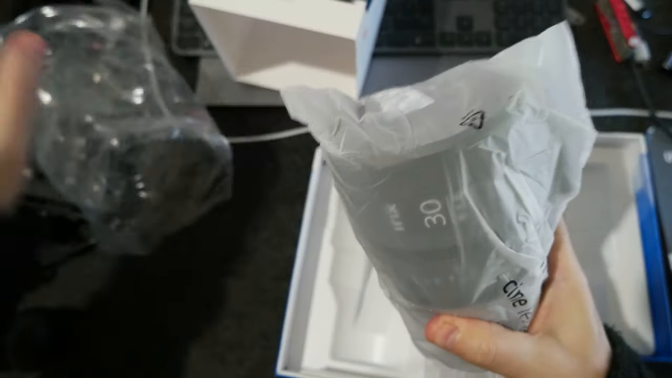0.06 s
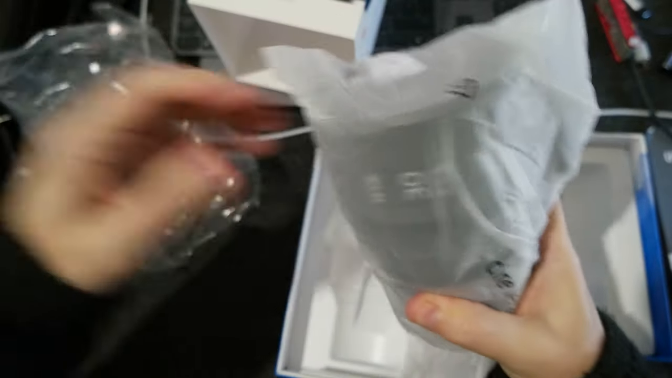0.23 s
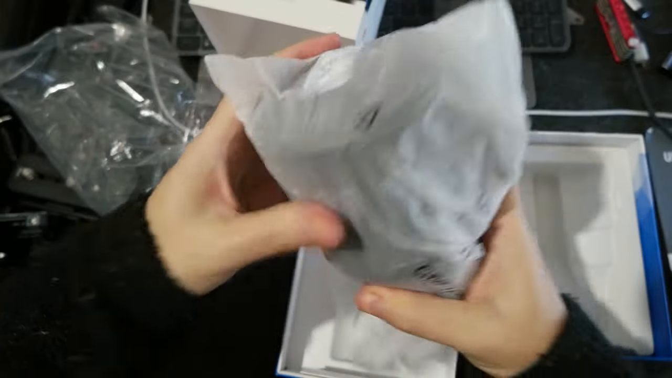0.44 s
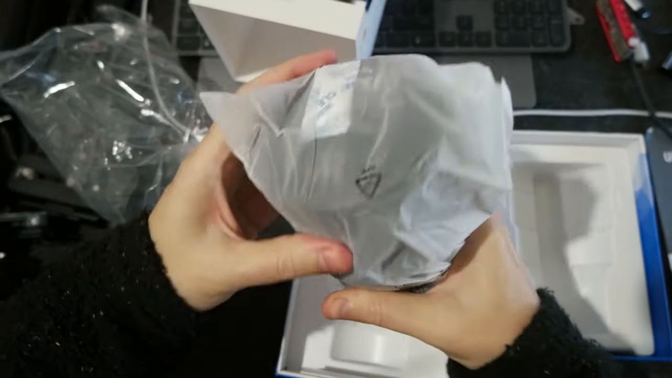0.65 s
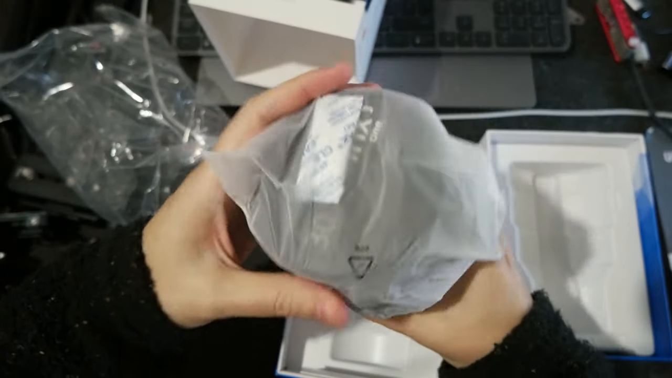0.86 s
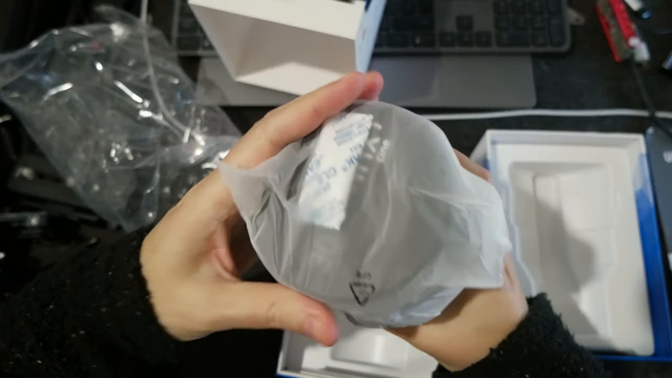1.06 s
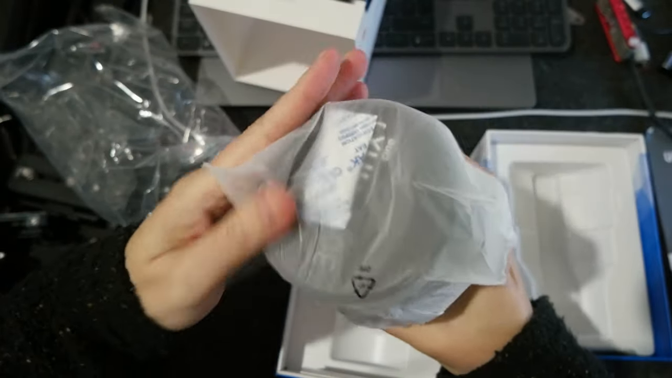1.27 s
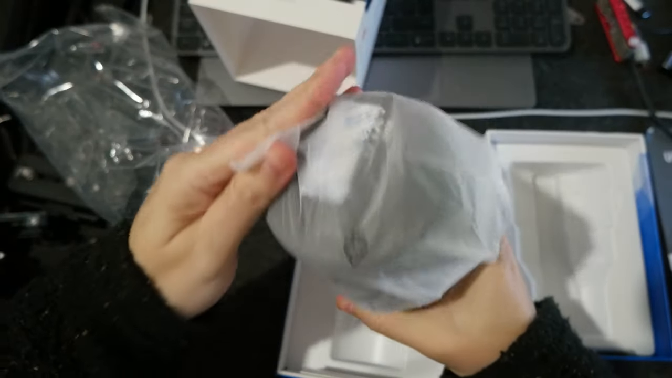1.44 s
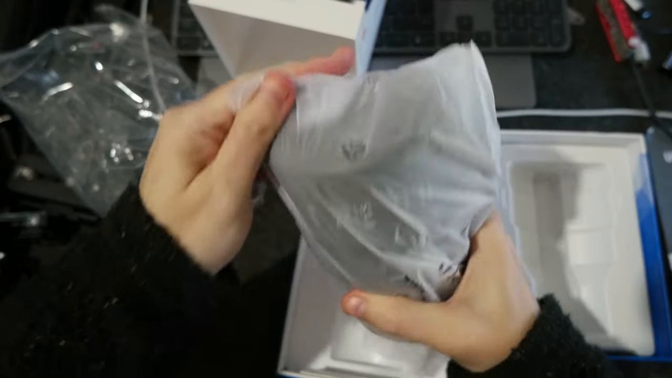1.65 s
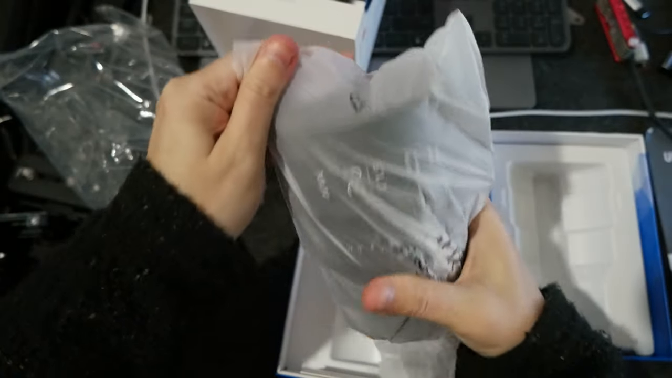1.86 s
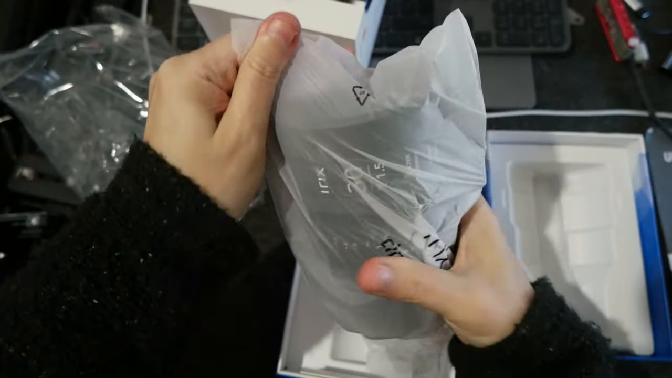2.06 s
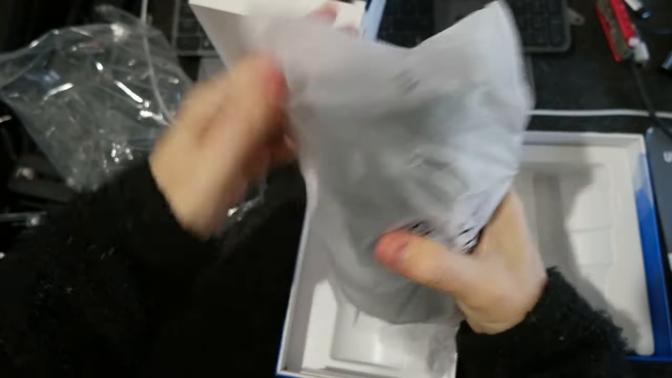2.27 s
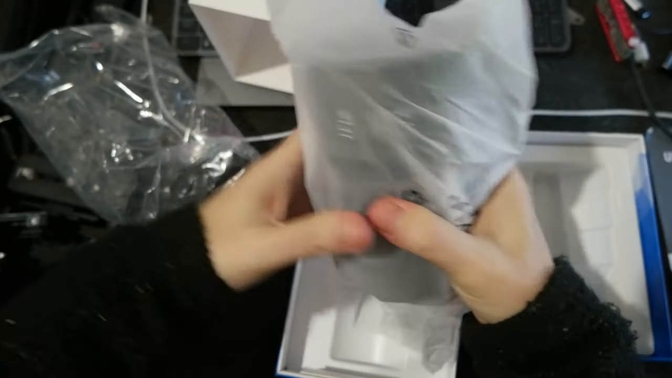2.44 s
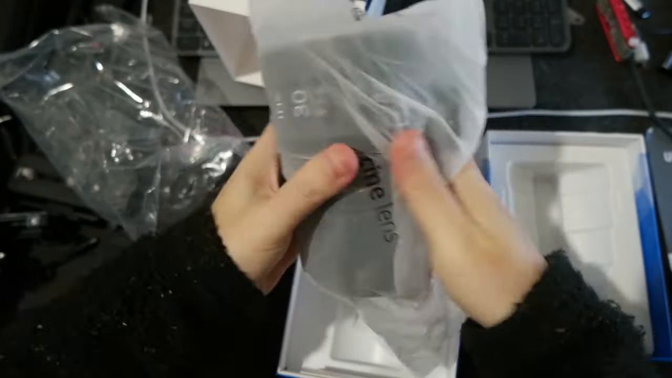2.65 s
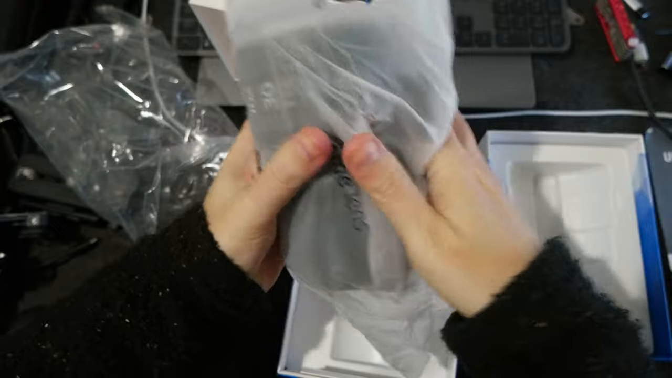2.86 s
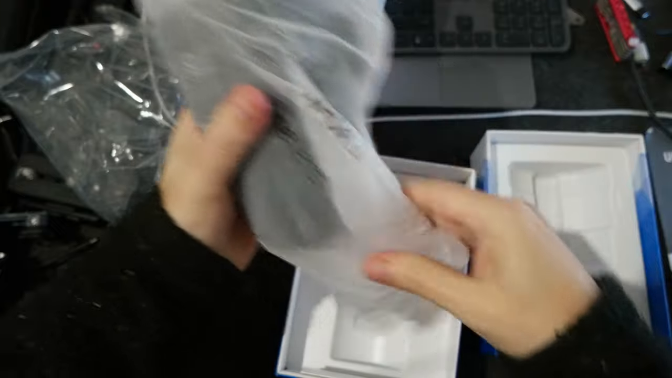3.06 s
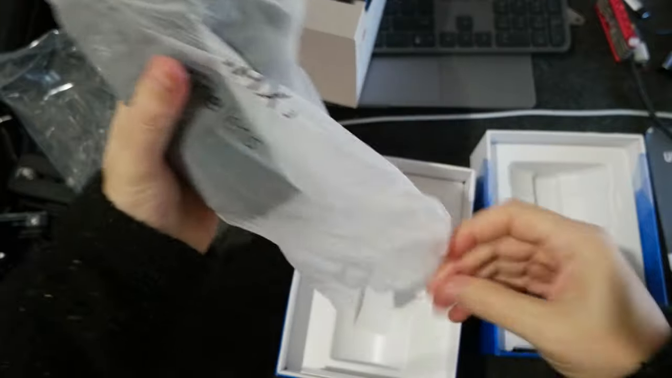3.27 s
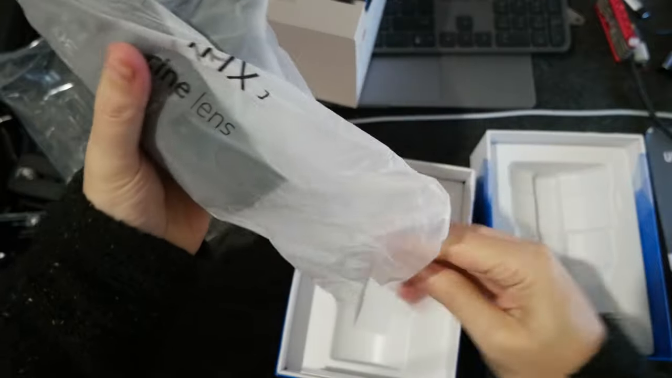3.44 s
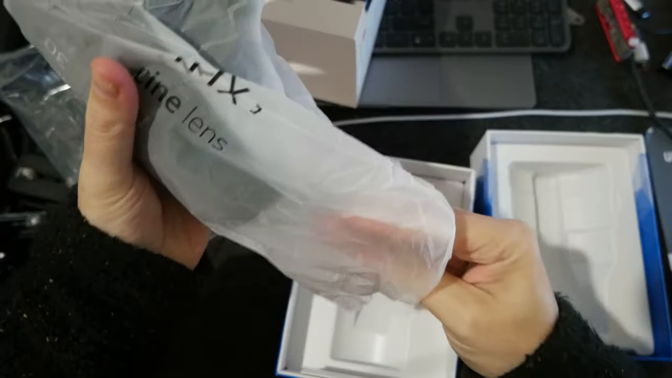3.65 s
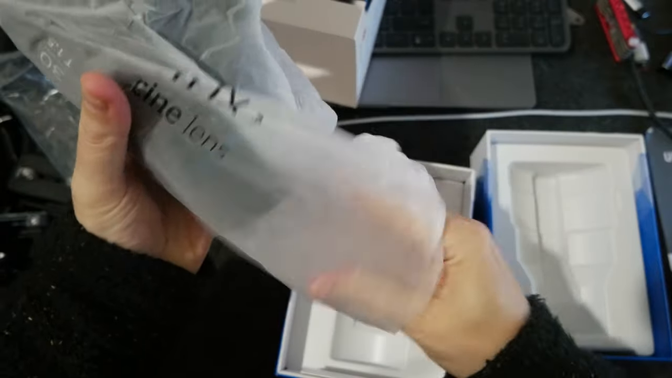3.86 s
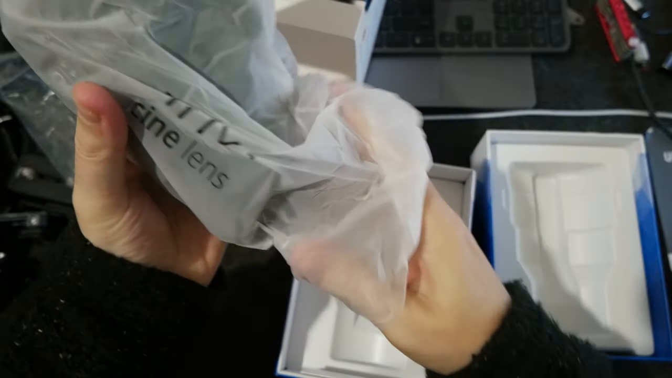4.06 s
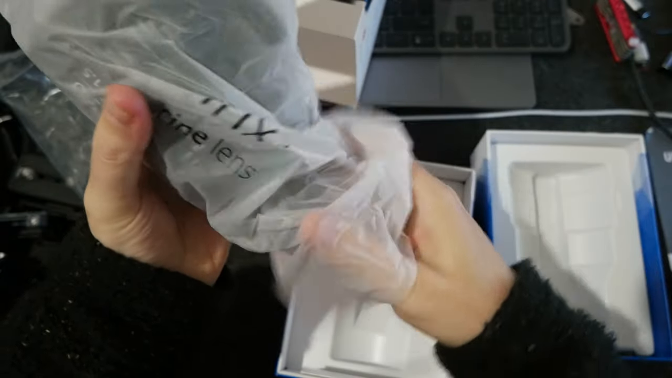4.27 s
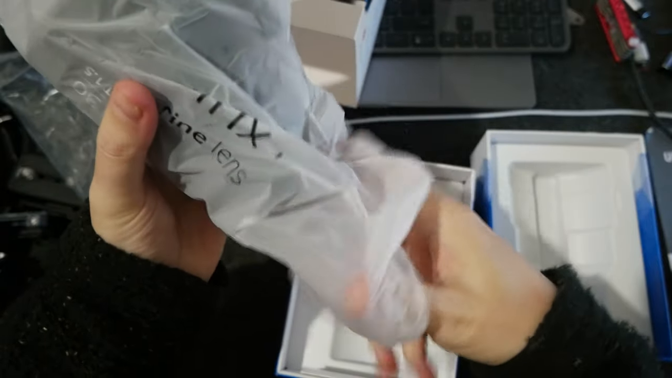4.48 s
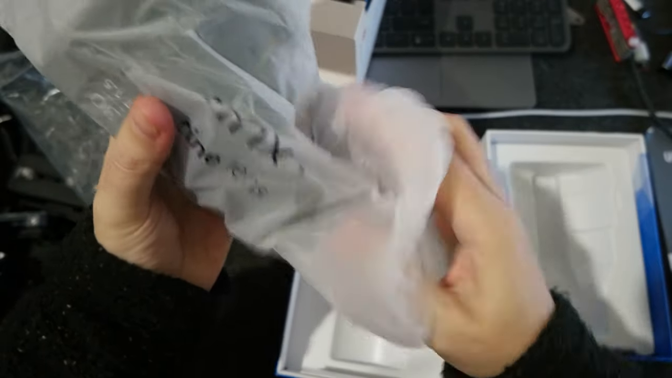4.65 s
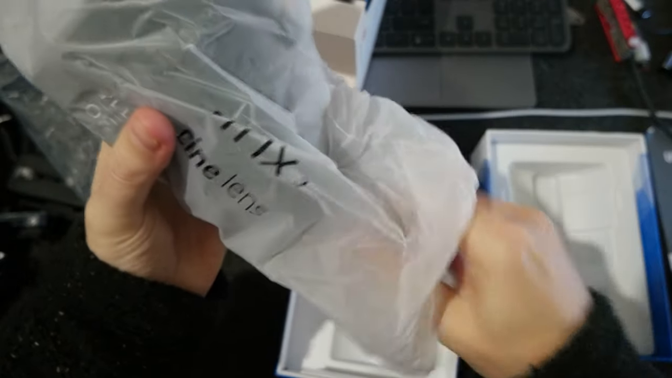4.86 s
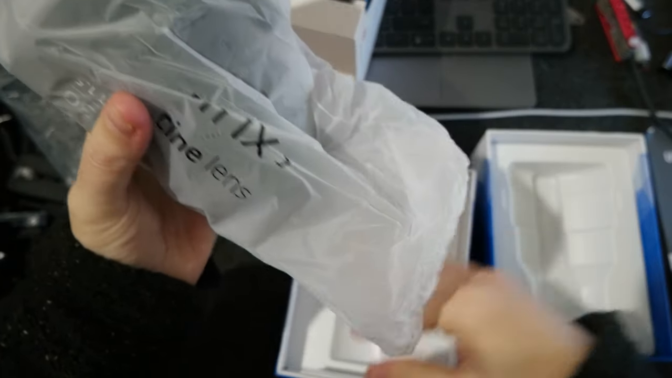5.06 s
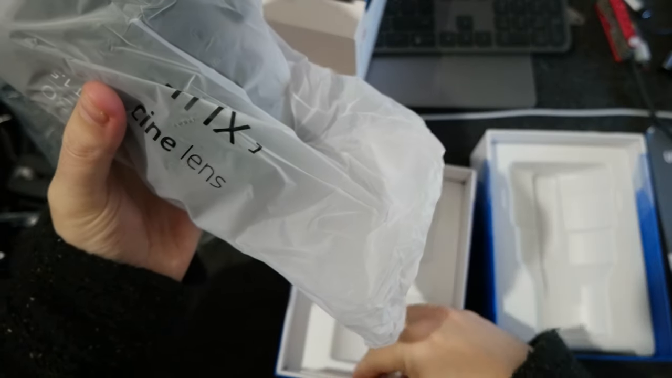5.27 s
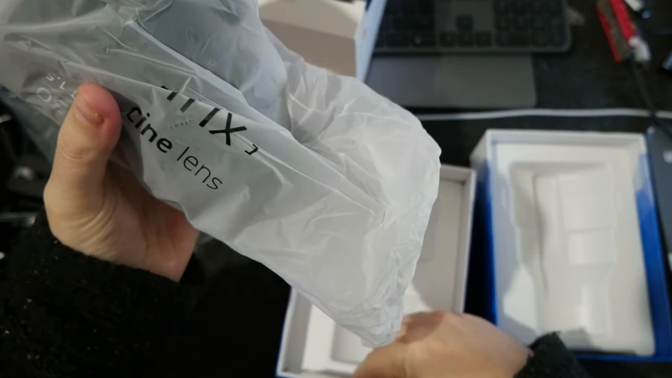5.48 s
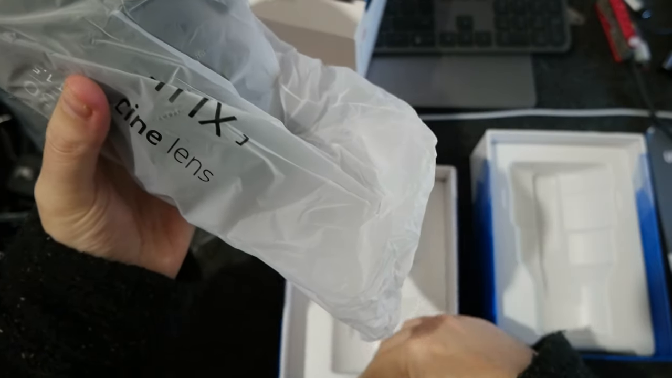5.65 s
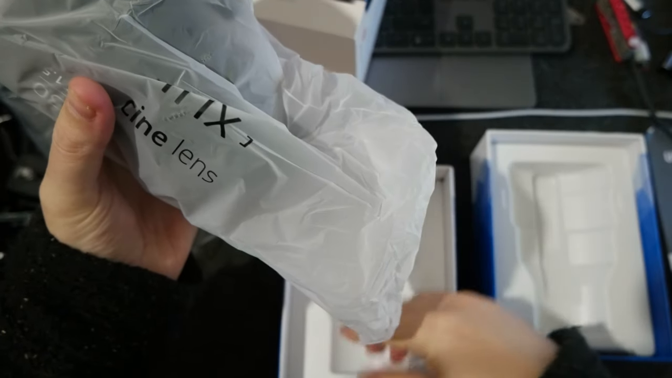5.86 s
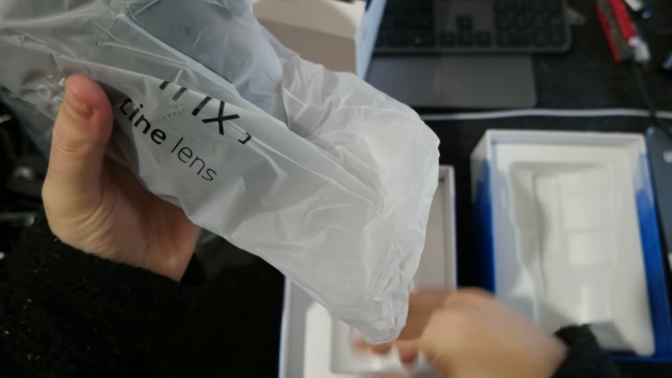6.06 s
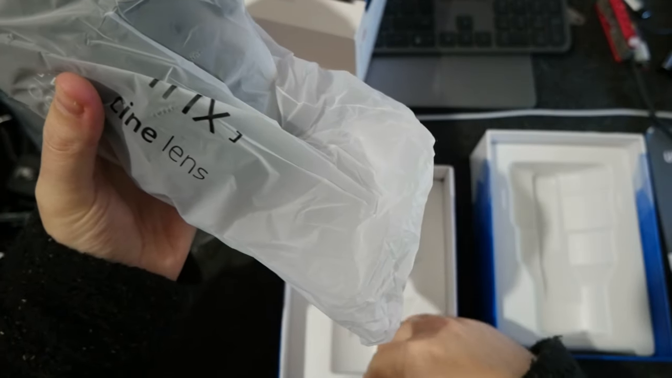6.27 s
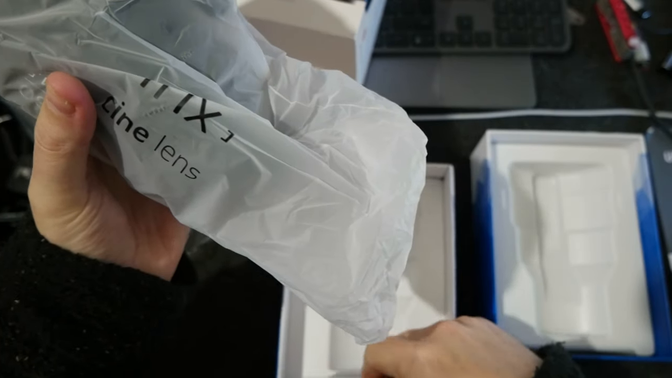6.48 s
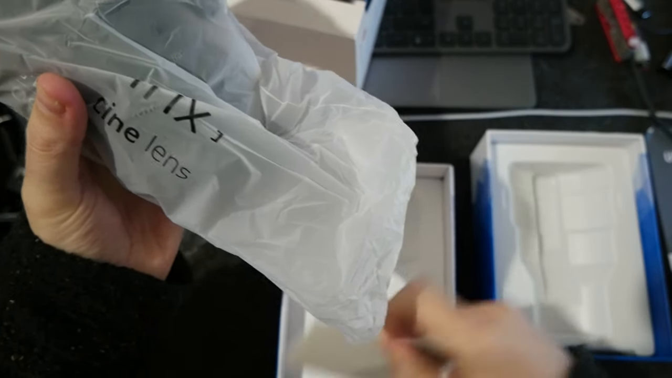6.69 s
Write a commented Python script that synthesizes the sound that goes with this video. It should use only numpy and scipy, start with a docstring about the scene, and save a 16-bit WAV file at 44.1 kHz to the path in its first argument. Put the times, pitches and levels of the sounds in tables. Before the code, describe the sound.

Close stereo pickup in a small indoor room: hands handle a thin plastic bag over a desk. Crisp, dense crackles come in quick irregular squeezes, with sharp bright snaps and soft low pops from air pockets. After nearly five seconds it drops to faint scattered ticks over a very low airy hush, then a hand slides briefly through a carton with a dull hollow rub.

```python
"""Thin plastic film crackles at once and close by: hands turn, squeeze and stretch a bag over a desk.
The film buckles in thousands of tiny creases, each a damped resonance struck by one impulse; larger folds
snap with a bright and a dull click, air pockets pop with low rings, and at the end a hand slides through
a carton, friction noise ringing its wall and hollow. Sparse decaying echoes return it all from the room
over a faint fan-like hush of shaped noise."""
import sys
import numpy as np
from scipy import signal
from scipy.fft import rfft, irfft, next_fast_len
from scipy.io import wavfile
from scipy.ndimage import uniform_filter1d

SR = 44100
rng = np.random.default_rng(int(sys.argv[2]) if len(sys.argv) > 2 else 0)


def generate_wav(signal):
    """Clip the signal to [-1, 1] and save it as 16-bit WAV at the path in sys.argv[1]."""
    frames = np.transpose(np.atleast_2d(signal))
    scaled = np.clip(frames, -1, 1) * 32767
    pcm = np.round(scaled).astype(np.int16)
    wavfile.write(sys.argv[1], SR, pcm)


N = 296337  # samples

# Colour of the film's clicks as the microphones receive them.
# Each row: frequency in Hz, relative level in dB per Hz.
FILM_COLOUR = [(24, -77), (40, -52), (231, -13.5), (345, -9.5), (382, -10), (697, -7), (751, -8.5),
               (831, -7.5), (1760, -4), (2000, -2.5), (7360, 0), (12800, 7), (16000, -1)]

EDGE_HZ = 15850  # upper band limit
GLIDE_S = 6.3  # from here the film glides instead of crumpling


def gain_of(db):
    """Logarithmic level: 20 dB is a factor of ten in amplitude."""
    return 10 ** (np.asarray(db) / 20)


def evened(x):
    """Normalisation by mean power: scales to rms 1."""
    return x / np.sqrt(np.mean(x ** 2) + 1e-20)


def read(points, hz):
    """Linear interpolation of a table along log frequency."""
    f, value = np.transpose(points)
    return np.interp(np.log(hz + 1), np.log(f + 1), value)


def crease(hz, centre_hz, sharp):
    """Damped resonance applied twice, with top gain 1: the response of one buckling patch."""
    detuning = hz / centre_hz - centre_hz / (hz + 1)
    return 1 / (1 + 1j * sharp * detuning) ** 2


def sides(pan_db):
    """Level difference between the channels: left over right in dB, split evenly into two gains."""
    return gain_of(np.array([pan_db, -pan_db]) / 2)


def stereo_width(hz, place, lean=0.071):
    """Stereo width: opposite phase shifts between left and right, growing with frequency, spread the crackle."""
    # Left-right phase at place + lean = 1. Each row: frequency in Hz, phase in radians.
    side_phase = [(300, 0.041), (2000, 0.033), (4000, 0.9), (8000, 1.23), (15000, 1.7)]
    shift = np.exp(.5j * (place + lean) * read(side_phase, hz))
    return np.array([shift, 1 / shift])


def hush(level_db=-55, patchy_db=.5):
    """Stationary noise with partial coherence: a hump in the low middle, in drifting patches."""
    # Spectrum of the room noise. Each row: frequency in Hz, relative level in dB per Hz.
    hush_colour = [(24, -69), (40, -29.5), (329, -14), (354, -5), (392, -17), (663, -5), (810, -12),
                   (1300, -16), (1410, -17), (1810, -12), (2320, -16), (12800, -28), (16000, -32.5)]
    # Left-right likeness of the noise. Each row: frequency in Hz, coherence from 0 to 1.
    likeness = [(60, 0.93), (180, 0.23), (550, 0.71), (1650, 0.73), (4970, 0.14), (15000, 0.16)]
    frames, hz = N // 256 + 5, np.fft.rfftfreq(1024, 1 / SR)
    a, b, c, d, patches = rng.standard_normal((frames, 513, 5)).T
    patches = uniform_filter1d(patches, size=20, axis=0)  # across frequency
    patches = evened(uniform_filter1d(patches, size=14, axis=1))  # across time
    same = np.clip(read(likeness, hz), -1, 1)[:, None]
    left, other = a + 1j * b, c + 1j * d
    z = np.array([left, same * left + np.sqrt(1 - same ** 2) * other])
    z *= gain_of(read(hush_colour, hz)[:, None] + patchy_db * patches)
    noise = signal.istft(z, nperseg=1024, noverlap=768)[1][:, :N]
    return gain_of(level_db) * evened(noise)


def effort():
    """Power addition of incoherent sources: squeezes sum to levels of panels, folds and creases each ms."""
    # Squeezes, pulls and turns of the hands. Each row: time of the peak in seconds, level of the small
    # creases in dB, rise and fall in seconds (over 20 dB for folds and creases), middle folds in dB over
    # the small creases, wide panels in dB over the small creases.
    squeezes = [(0.029, -37.5, 0.27, 0.074, 2, 3), (.16, -59.5, 0.19, 0.19, 15.5, 15.5),
                (.333, -35, .004, 0.095, -15, -9.5), (0.368, -28, 0.033, 0.063, -11.5, -30),
                (.457, -32, 0.029, 0.12, -9, -20), (.541, -29.5, 0.16, 0.15, -10, -15.5),
                (.662, -43.5, 0.14, 0.16, -1, -10.5), (.762, -35, .05, 0.16, -11, -11.5),
                (.86, -35, 0.16, 0.12, -5, -14), (1.0, -32, 0.071, 0.056, -6.5, -21),
                (1.07, -41.5, 0.086, .15, -12, -10.5), (1.15, -39, 0.12, 0.17, -11, -16.5),
                (1.225, -34, 0.038, 0.088, -5, -24), (1.303, -28.5, .12, .16, -4.5, -17.5),
                (1.443, -29.5, 0.052, 0.13, -10, -16), (1.556, -24, 0.094, 0.093, -5, -16.5),
                (1.64, -29, 0.058, 0.09, -6.5, -18.5), (1.732, -28, 0.059, 0.13, -4, -15.5),
                (1.82, -32, 0.067, 0.17, -4, -15), (1.9, -36, 0.075, .15, -6.5, -12),
                (2.03, -30, .13, 0.12, -10, -16), (2.15, -43, .015, 0.11, -18, -3),
                (2.221, -26.5, 0.077, .1, -7, -16), (2.41, -51, 0.21, 0.22, -2, -4),
                (2.487, -21, 0.031, 0.19, -10.5, -18.5), (2.696, -32.5, 0.12, 0.12, -5, -17),
                (2.86, -37, 0.19, 0.25, -15, -12), (2.941, -31, 0.18, 0.064, -7, -23),
                (3.083, -20, 0.066, 0.16, -8.5, -14.5), (3.18, -31, 0.15, 0.032, -6, -12),
                (3.305, -46, 0.016, 0.084, -2, -7), (3.461, -38, 0.011, 0.27, -7, -9),
                (3.546, -31.5, 0.044, .13, -8, -13.5), (3.62, -46, 0.093, 0.11, 1, -19),
                (3.71, -36, .007, 0.22, -8, -24), (3.77, -32.5, 0.05, 0.08, -4, -9.5),
                (3.893, -25.5, 0.17, 0.2, -3.5, -14.5), (4.0, -26.5, 0.22, 0.4, -5, -14.5),
                (4.109, -48, .3, 0.12, -24, -15), (4.235, -29, 0.026, 0.067, -6, -20),
                (4.285, -20, 0.077, .11, -6, -15), (4.41, -21.5, 0.036, 0.12, -5, -16.5),
                (4.54, -24.5, 0.08, 0.16, -4, -12.5), (4.63, -24, 0.13, 0.15, -7.5, -14.5),
                (4.73, -30.5, 0.042, 0.071, -8, -15), (4.825, -43.5, 0.068, 0.11, 3.5, -3.5),
                (4.99, -44.5, 0.013, 0.15, 1, -2.5), (5.044, -44.5, 0.11, 0.034, -2, -22),
                (5.34, -59.5, 0.016, 0.14, -7, 6), (5.448, -59, .1, 0.032, -13, -7),
                (5.625, -42.5, 0.0091, 0.095, -1.5, -12), (5.715, -46, .06, 0.067, 1, -5),
                (6.191, -48.5, .02, 0.058, -11, -5), (6.28, -62, 0.15, 0.42, -5, -8),
                (6.37, -51.5, 0.042, .2, 2.5, 1.5), (6.46, -37.5, 0.079, 0.24, 2.5, -15.5),
                (6.565, -26.5, 0.078, 0.11, -8.5, -18.5)]
    # Share of the swell in dB that each size follows, in the order panels, folds, creases [no unit].
    follow = [0.75, 1, 1]
    # Level of a bag that is only held, in the order panels, folds, creases [dB].
    held_db = [-69.5, -69.5, -70]
    rise_shape, fall_shape = 1.8, 1.5  # 1 = pointed swell in dB, 2 = round
    s = np.arange(0, N / SR + .001, .001)
    top_s, small_db, rise, fall, middle_db, wide_db = np.transpose(squeezes)[:, :, None]
    rising = abs((top_s - s) / rise) ** rise_shape
    falling = abs((s - top_s) / fall) ** fall_shape
    drop_db = -20 * np.where(s < top_s, rising, falling)
    tops_db = [small_db + wide_db, small_db + middle_db, small_db]
    power = [np.sum(gain_of(top + share * drop_db) ** 2, axis=0) + gain_of(rest) ** 2
             for top, share, rest in zip(tops_db, follow, held_db)]
    return s, 10 * np.log10(power)


def crackle(per_s=14000, spread_db=3.0, clump_db=1.0, patch_db=4.0, clump_s=0.0086, kicks_per_s=120,
            pan_db=-0.8, sharp=0.89):
    """Shot noise through resonances: random creases of many sizes and places clump under the fingers.

    The three spreads, spread_db, clump_db and patch_db, are for an unevenness of 1.
    """
    # Bands where panels, folds and creases sound. Each row: low edge in Hz, high edge in Hz.
    size_bands = [(200, 1200), (1500, 5000), (6000, 16000)]
    size = next_fast_len(N + 4096)
    hz, t = np.fft.rfftfreq(size, 1 / SR), np.arange(N) / SR
    s, levels_db = effort()
    # 0.69 where small creases reach -31.5 dB; louder squeezes crackle more evenly
    uneven = np.where(s < GLIDE_S, 0.69 - 0.05 * (levels_db[2] + 31.5), .15)
    uneven = np.clip(uneven, 0, .7)
    when, kind, strength, chance = rng.random((200000, 4)).T
    at = (when * N).astype(int)

    # a slip starts at once and dies away
    kicks = rng.exponential(1, (7, N)) ** 2 * (rng.random((7, N)) < kicks_per_s / SR)
    slips = signal.lfilter([1], [1, -np.exp(-1 / (clump_s * SR))], kicks)
    drift = np.log(slips + 0.36)
    # one pace for the whole bag, one for each range of crease size
    clumps, *patches = evened(drift - drift.mean())
    patch = np.array(patches)[(kind * len(patches)).astype(int), at]

    blow_db = np.minimum(-spread_db * np.log(1 - strength), 4 * spread_db)
    blow_db = blow_db + clump_db * clumps[at] + patch_db * patch
    struck = chance < per_s * N / SR / len(at)
    blow = gain_of(blow_db * np.interp(t[at], s, uneven)) * struck
    # even out the local power, so that the hands set the effort
    power = uniform_filter1d(np.bincount(at, blow ** 2, N), size=4000)
    blow = blow / np.sqrt(power[at] + 1e-9)

    pitches = np.geomspace(120, 15500, 16)  # Hz
    places = np.linspace(-1, 1, 3)
    kind = (kind * len(pitches) * len(places)).astype(int)
    # the summed power of all resonances is divided out below
    cover = np.sqrt(sum(abs(crease(hz, f, sharp)) ** 2 for f in pitches) / len(pitches))
    colour = gain_of(read(FILM_COLOUR, hz))
    share_db = [10 * np.log10(np.sum(colour[(hz > lo) & (hz < hi)] ** 2) / len(hz))
                for lo, hi in size_bands]
    drive_db = levels_db - np.array(share_db)[:, None]
    centres = np.log(np.sqrt(np.prod(size_bands, axis=1)))

    out = np.zeros((2, len(hz)), complex)
    for k, centre_hz in enumerate(pitches):
        # blend the levels of the nearest sizes
        weights = [np.interp(np.log(centre_hz), centres, one) for one in np.eye(len(size_bands))]
        gain = gain_of(np.interp(t, s, weights @ drive_db)) * sides(pan_db)[:, None]
        for p, place in enumerate(places):
            mine = kind == k * len(places) + p
            pair = rfft(np.bincount(at[mine], blow[mine], N) * gain, size)
            out += pair * crease(hz, centre_hz, sharp) * stereo_width(hz, place)
    return irfft(out / cover * colour, size)[:, :N]


def pops():
    """Impulse response of a low resonance: air pockets and wide panels pop with a soft ring."""
    # Each row: start in seconds, peak level in dB, pitch in Hz, sharpness of the resonance (no unit).
    pop_rows = [(.029, -30.5, 1620, 38), (.031, -23, 960, 3.6), (.761, -37, 750, 2.5),
                (.871, -37, 656, 5.5), (1.05, -38, 670, 2.7), (1.552, -28, 1070, 3.7),
                (1.729, -33, 840, 3.3), (1.841, -26.5, 2150, 8.1), (2.19, -41, 550, 1.6),
                (2.214, -40, 534, 3.6), (2.507, -30.5, 840, 1.9), (4.107, -26, 880, 4.4),
                (4.292, -23, 680, 1.7), (4.508, -28, 840, 5.3), (4.612, -31, 610, 2.2),
                (4.734, -39, 830, 3.8), (5.013, -35, 855, 1.4), (5.349, -47, 663, 9.8),
                (6.192, -49, 560, 3)]
    size = 4096
    out = np.zeros(N + size)
    hz = np.fft.rfftfreq(size, 1 / SR)
    for s, peak_db, centre_hz, sharp in pop_rows:
        ring = irfft(crease(hz, centre_hz, sharp), size)
        out[round(s * SR):][:size] += gain_of(peak_db) * ring / abs(ring).max()
    return out[:N]


def lesser_snaps(count=220, dull_hz=(2400, 5940)):
    """Uniform random timing: chance snaps whose strength follows the level of the small creases."""
    s, levels_db = effort()
    when, strength, dullness, pitch = rng.random((count, 4)).T
    when = .01 + when * (GLIDE_S - .01)
    bright_db = np.interp(when, s, levels_db[2]) + 11 + 6 * strength  # 11 to 17 dB over the creases
    dull_db = bright_db + np.interp(dullness, [0, 1], (-6, -20))  # 6 to 20 dB under the bright click
    return np.transpose([when, bright_db, dull_db, dull_hz[0] + pitch * (dull_hz[1] - dull_hz[0])])


def snaps(sharp=1.8, rattle_sharp=0.62, shared_part=0.96, grit_db=7.5, t60=0.036):
    """Snap-through buckling: a fold flips with a bright and a dull click, and the film around it rattles."""
    # The clearest folds that snap alone. Each row: time in seconds, level of the bright click in dB,
    # level of the dull click in dB, pitch of the dull click in Hz.
    clear_snaps = [(0.032, -19, -13, 1700), (0.1082, -45, -29, 2100), (0.123, -35, -19, 2400),
                   (0.1495, -38, -19, 2800), (0.2522, -47, -25, 2700), (0.3426, -9, -16, 5600),
                   (0.369, -12, -18, 5100), (0.3794, -3, -22, 3600), (0.4492, -14, -33, 3000),
                   (0.5023, -13, -25, 3900), (0.5951, -13, -28, 4100), (0.6065, -11, -27, 4800),
                   (0.6338, -17, -35, 3500), (0.6622, -20, -32, 4600), (0.703, -24, -40, 2600),
                   (0.7546, -13, -26, 4500), (0.8676, -13, -19, 5600), (0.8761, -14, -24, 4900),
                   (0.897, -19, -22, 3400), (0.9248, -20, -26, 4100), (0.938, -22, -31, 3500),
                   (0.9655, -13, -29, 3300), (0.9837, -11, -25, 3900), (0.9945, -14, -17, 4300),
                   (1.005, -13, -30, 4500), (1.1253, -30, -29, 3300), (1.1327, -20, -37, 5100),
                   (1.1411, -14, -32, 3700), (1.1552, -15, -31, 3700), (1.2185, -20, -14, 3300),
                   (1.2291, -9, -19, 5100), (1.2877, -9, -19, 3200), (1.2956, -13, -14, 3800),
                   (1.3517, -12, -22, 2700), (1.3728, -7, -29, 4400), (1.4079, -9, -21, 2600),
                   (1.4396, -10, -28, 3600), (1.4744, -7, -29, 5200), (1.4936, -12, -27, 4100),
                   (1.5235, -17, -16, 2800), (1.5377, -6, -20, 3400), (1.555, -5, -20, 2500),
                   (1.6208, -10, -21, 2400), (1.6322, -11, -15, 3300), (1.6971, -14, -19, 3100),
                   (1.7169, -11, -20, 3900), (1.7265, -7, -24, 4500), (1.7359, -6, -22, 4300),
                   (1.7551, -11, -22, 3100), (1.7863, -2, -24, 3500), (1.841, -13, -18, 3100),
                   (1.8631, -8, -28, 4300), (1.8834, -8, -23, 3500), (1.9115, -11, -30, 6100),
                   (1.9233, -2, -28, 4500), (1.9703, -10, -24, 4800), (1.9965, -14, -29, 3600),
                   (2.0366, -13, -28, 3500), (2.0766, -15, -35, 3200), (2.1402, -12, -37, 3700),
                   (2.1816, -13, -26, 2000), (2.2171, -5, -22, 4300), (2.2341, -2, -21, 5200),
                   (2.3417, -20, -31, 5600), (2.3558, -29, -36, 3700), (2.379, -31, -31, 4500),
                   (2.4163, -26, -31, 3700), (2.4321, -25, -41, 3000), (2.4417, -20, -31, 4100),
                   (2.4768, -10, -20, 2700), (2.5227, -5, -16, 3600), (2.5964, -9, -17, 5400),
                   (2.6569, -13, -26, 4600), (2.6892, -11, -21, 4200), (2.6981, -24, -20, 3800),
                   (2.7372, -24, -23, 5700), (2.8543, -19, -23, 4800), (2.8717, -23, -20, 4800),
                   (2.9052, -19, -18, 3300), (2.9372, -17, -19, 3900), (2.9565, -14, -23, 3100),
                   (2.976, -15, -27, 4300), (3.0139, -8, -24, 5200), (3.0818, -6, -22, 3700),
                   (3.1175, -5, -17, 3400), (3.2353, -20, -30, 3600), (3.2992, -27, -34, 3500),
                   (3.308, -29, -27, 3000), (3.4186, -44, -38, 2900), (3.461, -16, -32, 3300),
                   (3.6092, -29, -23, 2800), (3.7075, -22, -30, 5000), (4.0217, -3, -20, 3300),
                   (4.0437, -2, -17, 3300), (4.1235, -11, -25, 3800), (4.1591, -14, -24, 1800),
                   (4.2309, -9, -18, 3700), (4.2974, -9, -11, 4500), (4.5422, -5, -19, 4000),
                   (4.586, -6, -17, 3400), (4.6579, -8, -20, 3100), (4.7101, -4, -22, 2600),
                   (4.9858, -28, -40, 5100), (5.0407, -15, -23, 4900), (5.0479, -25, -35, 2600),
                   (5.0748, -37, -30, 2900), (5.138, -49, -38, 2700), (5.1639, -38, -42, 3700),
                   (5.2472, -43, -44, 3900), (5.257, -39, -35, 2900), (5.329, -32, -33, 4300),
                   (5.3531, -46, -42, 2100), (5.3819, -33, -32, 2700), (5.6236, -23, -29, 4600),
                   (5.6343, -29, -39, 4400), (5.6642, -36, -33, 4300), (5.704, -27, -38, 2700),
                   (5.8343, -32, -33, 1600), (5.8764, -49, -33, 2300), (5.9293, -56, -40, 2900),
                   (5.9443, -44, -38, 3700), (6.0249, -48, -55, 1800), (6.182, -39, -39, 2000),
                   (6.1974, -40, -38, 2400), (6.2492, -46, -34, 2700)]
    bright_hz = (10900, 14300)  # pitch range of the bright click
    size, lead = 2048, 32  # samples; the lead leaves room for the click's onset
    out = np.zeros((2, N + size))
    hz, t = np.fft.rfftfreq(size, 1 / SR), np.arange(size) / SR
    colour = gain_of(read(FILM_COLOUR, hz)) * (hz < EDGE_HZ)
    for s, bright_db, dull_db, dull_hz in [*clear_snaps, *lesser_snaps()]:
        place, pan_db = rng.uniform(-0.4, 0.88), -.9 + 1.2 * rng.standard_normal()
        for peak_db, centre_hz in [(bright_db, rng.uniform(*bright_hz)), (dull_db, dull_hz)]:
            click = irfft(colour * crease(hz, centre_hz, sharp) * stereo_width(hz, place), size)
            click = np.roll(click, lead, axis=1)
            click = click / abs(signal.hilbert(click.mean(0))).max()

            grit = gain_of(grit_db * rng.standard_normal(size))
            shared, left, right = rng.standard_normal((3, size)) * grit
            own = np.sqrt(abs(1 - shared_part ** 2)) * np.array([left, right])
            shake = shared_part * shared + own
            shake = evened(irfft(rfft(shake) * crease(hz, centre_hz, rattle_sharp), size))
            rattle_db = -15 - .2 * (peak_db + 10)  # relative to the click; weak clicks rattle more
            shake = np.roll(shake * gain_of(rattle_db - 60 * t / t60), lead, axis=1)

            snap = gain_of(peak_db) * (click + shake) * sides(pan_db)[:, None]
            out[:, round(s * SR) - lead:][:, :size] += snap
    return out[:, :N]


def room(x, wet_db=-12):
    """Exponential reverberant decay: sparse taps of random sign, each band dying at its own speed."""
    # Reverberation time of the room. Each row: frequency in Hz, time to fall by 60 dB in seconds.
    decay_times = [(200, 0.1), (1000, 0.16), (4000, 0.2), (14000, 0.18)]
    taps = np.zeros((2, SR // 2))
    at = np.arange(300, SR // 2 - 20, 20) + rng.integers(0, 20, (2, (SR // 2 - 301) // 20))
    np.put_along_axis(taps, at, rng.choice([-1., 1.], at.shape), 1)
    hz, t, z = signal.stft(taps, SR, nperseg=256)
    decay = gain_of(-60 * t / read(decay_times, hz)[:, None])
    tail = signal.istft(z * decay, SR, nperseg=256)[1]
    tail = gain_of(wet_db) * tail / np.linalg.norm(tail[0])
    return signal.fftconvolve(x, tail, axes=1)[:, :N]


def slide(grit_db=3.0):
    """Friction noise exciting resonators: a sliding hand rings the wall and the hollow of the carton."""
    # A hand slides through the carton.
    # Each row: time in seconds, level of the thin wall in dB, level of the hollow in dB.
    slide_levels = [(6.33, -77, -64), (6.37, -49, -59), (6.41, -47, -51), (6.445, -40, -56),
                    (6.52, -44, -60), (6.56, -49, -44), (6.59, -57, -41), (6.65, -76, -56),
                    (6.72, -73, -53)]
    # Thin wall, then hollow. Each row: pitch in Hz, sharpness of the resonance (no unit).
    carton_modes = [(2480, 4), (560, 4)]
    s, *levels_db = np.transpose(slide_levels)
    t, hz = np.arange(N) / SR, np.fft.rfftfreq(N, 1 / SR)
    rub = rfft(rng.standard_normal(N) * gain_of(grit_db * rng.standard_normal(N)))
    rings = [evened(irfft(rub * crease(hz, f, sharp), N)) for f, sharp in carton_modes]
    return sum(ring * gain_of(np.interp(t, s, db, left=-120)) for ring, db in zip(rings, levels_db))


def scene():
    """Superposition: the bag and the carton, their echoes and the room noise."""
    near = crackle() + snaps() + pops() + slide()
    return near + room(near) + hush()


def record(dry):
    """Linear-phase low-pass filtering: the band limit of the recorder."""
    low_pass = signal.firwin(511, EDGE_HZ, window=("kaiser", 9), fs=SR)
    return signal.oaconvolve(dry, low_pass[None], "same")


dry = scene()
out = record(dry)
generate_wav(out)
```